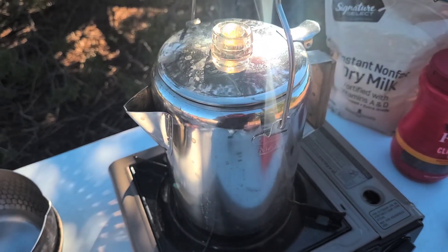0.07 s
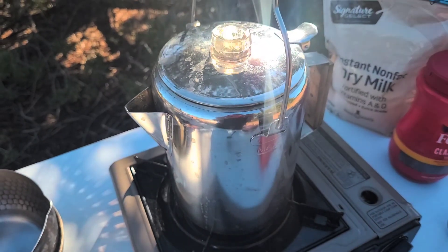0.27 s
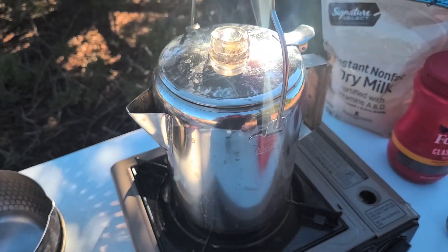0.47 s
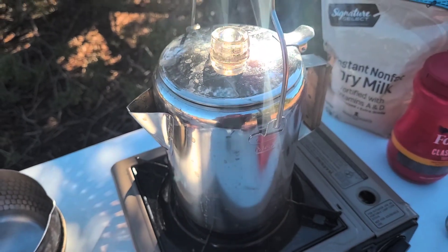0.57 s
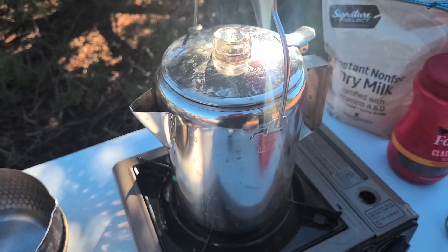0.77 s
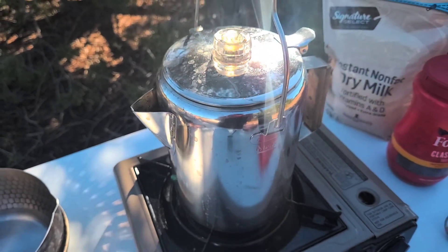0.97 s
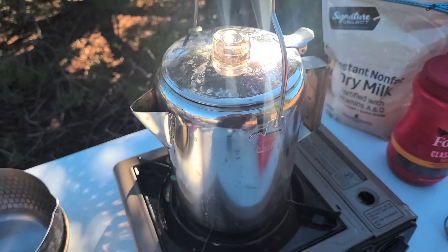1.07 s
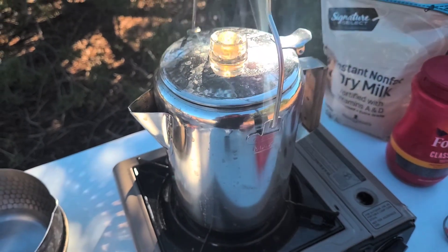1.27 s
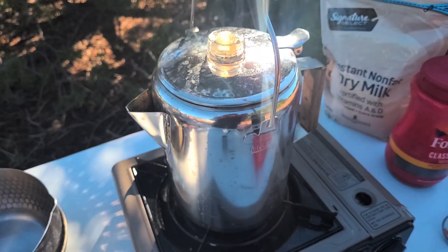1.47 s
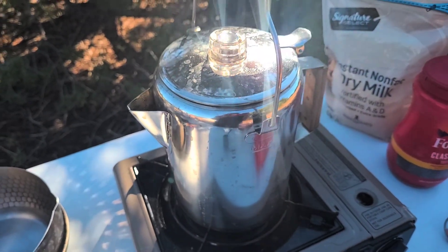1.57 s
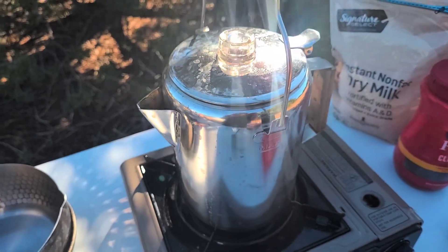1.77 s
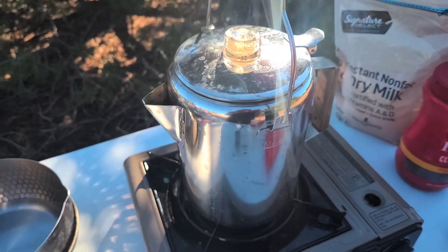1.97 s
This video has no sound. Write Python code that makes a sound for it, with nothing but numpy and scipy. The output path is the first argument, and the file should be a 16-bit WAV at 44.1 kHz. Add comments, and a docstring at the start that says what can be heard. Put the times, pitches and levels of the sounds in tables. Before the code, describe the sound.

Boiling water gurgles in surges inside a metal pot, with soft burner roar and light wind

```python
"""Dull thuds of big steam bubbles come in surges from a metal percolator on a small gas stove outdoors.
Splashes brighten each surge: pot sounds are damped sines, singly or massed over coloured noise.
The burner roars softly, with thin fizz and faint hiss, all filtered noise. A light wind buffets the two
ports of the close microphone, mostly the right one: low noise and single low damped sines."""
import sys
import numpy as np
from scipy import signal
from scipy.fft import rfft, irfft, next_fast_len
from scipy.io import wavfile
from scipy.ndimage import map_coordinates

SR = 44100
rng = np.random.default_rng(int(sys.argv[2]) if len(sys.argv) > 2 else 0)


def voltage_ratio(level):
    """Linear amplitude factor for a level in decibels (scalar or array-like)."""
    return 10 ** (np.asarray(level, float) / 20)


def pcm_store(signal):
    """Save signal as 16-bit PCM."""
    levels = np.round(np.clip(np.atleast_2d(signal), -1, 1) * 32767)
    wavfile.write(sys.argv[1], SR, levels.astype(np.int16).T)


N = 89258


def unit(x):
    """Scale to rms 1."""
    return x / np.sqrt(np.mean(x ** 2) + 1e-20)


def along(points, hz):
    """Interpolate (f/Hz, value) points on a log frequency axis."""
    f, v = np.transpose(points)
    return np.interp(np.log(hz + 1), np.log(f + 1), v)


def curves(rows):
    """One value per sample for each column after t/s."""
    t_s, *columns = np.transpose(rows)
    return [np.interp(np.arange(N) / SR, t_s, column) for column in columns]


def wobble(knots_per_s):
    """Smooth random curve through normal knots."""
    return map_coordinates(rng.standard_normal(400), [np.arange(N) * knots_per_s / SR])


def filtered(x, response):
    """Multiply the spectrum of x by a response of f/Hz."""
    m = next_fast_len(N + SR // 2)
    return irfft(rfft(x, m) * response(np.fft.rfftfreq(m, 1 / SR)), m)[..., :N]


def coloured_pair(spectrum):
    """Two unrelated noises with the given spectrum."""
    return filtered(rng.standard_normal((2, N)), lambda hz: voltage_ratio(along(spectrum, hz)))


def bubbles(start_s, gain, hz, cycles):
    """Sum of damped sines, soft start, rising pitch; the envelope peaks after half of cycles."""
    t = np.arange(SR // 5) / SR
    u = t * (hz / cycles)[:, None]
    envelope = gain[:, None] * np.e * 2 * u * np.exp(-2 * u)
    tone = envelope * np.sin(2 * np.pi * hz[:, None] * t * (1 + 0.025 * u))
    tone = tone * np.minimum(1, 3 * (1 - t / t[-1]))  # fade the last third
    at = (np.round(start_s * SR).astype(int)[:, None] + np.arange(len(t))).ravel()
    # samples before time 0 are silenced
    return np.bincount(np.clip(at, 0, None), tone.ravel() * (at >= 0), N + SR)[:N]


def froth(spectrum, low_hz, high_hz, cycles, spread_db, count):
    """Two unrelated streams of random bubbles on band noise, filtered to a colour."""
    noise_db = -4.5  # re bubbles
    streams = []
    for _ in range(2):
        d = rng.random((count, 4))
        start_s = d[:, 0] * (N / SR + 0.041) - 0.05
        hz = low_hz * (high_hz / low_hz) ** d[:, 1]
        size = hz * voltage_ratio(-spread_db * np.log(1 - d[:, 2])) * np.sign(d[:, 3] - 0.5)
        grains = bubbles(start_s, size, hz, np.full(count, cycles))
        band = filtered(rng.standard_normal(N), lambda f: (f > low_hz / 2) & (f < 2 * high_hz))
        streams.append(unit(grains) + voltage_ratio(noise_db) * unit(band))
    return unit(filtered(np.array(streams), lambda f: voltage_ratio(along(spectrum, f))))


# stereo balance: f/Hz, left minus right/dB
STOVE_LEAN = [(100, 5), (200, 4), (400, 7.5), (700, 10.5), (1300, 7.5)]
# likeness of left and right: f/Hz, share/1
STOVE_LIKENESS = [(100, .92), (200, .96), (400, .86), (700, .8), (1300, .3)]


def spread(pair):
    """Place a stream and its unrelated twin left of centre by level and lag, less alike in the treble."""
    left_lag_s = -0.00015  # left leads
    way = np.array([[1], [-1]])

    def mid_side(hz):
        turn = np.arccos(np.clip(along(STOVE_LIKENESS, hz), -1, 1)) / 2
        return np.array([np.cos(turn), np.sin(turn)])

    def ports(hz):
        return voltage_ratio(way * along(STOVE_LEAN, hz) / 2) * np.exp(-1j * way * np.pi * hz * left_lag_s)

    mid, side = filtered(pair, mid_side)
    return filtered(np.array([mid + side, mid - side]), ports)


# biggest bubbles: t/s, level/dB, f/Hz, length/cycles
BIG_BUBBLES = [(-.021, -28, 153, 11), (.038, -30, 153, 6), (.154, -35, 250, 3), (.245, -37, 140, 3),
               (.275, -35, 135, 2.5), (.43, -36, 230, 2), (.584, -34, 220, 1.5), (.605, -26, 180, 1.8),
               (.631, -32, 165, 1.3), (.646, -32, 180, 1.3), (.672, -32, 150, 1.8), (.83, -36, 160, 2),
               (.881, -33, 160, 3), (.93, -33, 170, 2), (.99, -39, 230, 3), (1.173, -38, 210, 2),
               (1.247, -33, 100, 1.6), (1.278, -37, 140, 1.6), (1.384, -41, 220, 1.5),
               (1.465, -36, 140, 1.8), (1.63, -41, 230, 3), (1.662, -38, 160, 2), (1.69, -40, 240, 4),
               (1.905, -36, 210, 2), (1.945, -37, 200, 2)]


def glugs():
    """Biggest steam bubbles: single damped sines, the first begun before time 0."""
    t_s, level_db, hz, cycles = np.transpose(BIG_BUBBLES)
    return bubbles(t_s, voltage_ratio(level_db), hz, cycles)


# boiling surges: t/s, thud level/dB, splash level/dB
SURGES = [(.0, -39, -52), (.063, -38, -46), (.089, -41, -55), (.117, -41, -53), (.189, -46, -61),
          (.271, -41, -54), (.359, -46, -68), (.431, -41, -50), (.469, -43, -57), (.563, -47, -63),
          (.613, -39, -54), (.667, -42, -55), (.76, -51, -69), (.82, -50, -66), (.85, -44, -61),
          (.953, -41, -54), (1.013, -48, -69), (1.135, -50, -69), (1.18, -46, -57), (1.277, -45, -57),
          (1.327, -51, -64), (1.393, -47, -69), (1.415, -53, -70), (1.459, -44, -55), (1.5, -46, -58),
          (1.569, -52, -68), (1.641, -46, -58), (1.7, -46, -63), (1.789, -50, -73), (1.82, -48, -62),
          (1.927, -42, -58), (2.0, -47, -64)]
# thud filter: f/Hz, gain/dB
THUD_COLOUR = [(47, -40), (80, 4), (108, -3), (151, -1.5), (193, -4), (225, 0), (309, -6), (376, -21),
               (450, -13.5), (580, -47), (990, -120)]


def thuds():
    """Massed low bubbles, level following the surges."""
    thud_db, _ = curves(SURGES)
    return voltage_ratio(thud_db) * froth(THUD_COLOUR, low_hz=73.6, high_hz=420, cycles=3.12, spread_db=1.5, count=600)


# splash filter: f/Hz, gain/dB
SPLASH_COLOUR = [(190, -18.5), (330, 0), (377, -13.5), (430, -9), (563, -13.5), (901, -33.5), (1300, -48.5),
                 (1690, -64.5), (2860, -120)]


def splashes():
    """Massed higher, smaller bubbles, level following the surges."""
    _, splash_db = curves(SURGES)
    grains = froth(SPLASH_COLOUR, low_hz=330.2, high_hz=1110, cycles=3.5, spread_db=1.5, count=1000)
    return voltage_ratio(splash_db) * grains


# burner spectrum: f/Hz, density/dB
FLAME_COLOUR = [(150, -30.5), (250, 3.5), (340, -3), (575, -31), (714, -23.5), (809, -37.5), (1200, -41.5),
                (1560, -75), (2640, -120)]


def flame():
    """Soft steady burner roar: filtered noise."""
    return voltage_ratio(-55.5) * spread(unit(coloured_pair(FLAME_COLOUR)))


# spray spectrum: f/Hz, density/dB
FIZZ_COLOUR = [(900, -27.5), (1200, -5.5), (2500, -7.5), (4000, -16), (6000, -14)]


def fizz():
    """Thin spray noise, 900 to 6000 Hz, swelling with the splashing."""
    level_db, growth_db_per_db = -89, 0.29
    _, splash_db = curves(SURGES)
    noise = filtered(rng.standard_normal((2, N)),
                     lambda f: voltage_ratio(along(FIZZ_COLOUR, f)) * (f > 900) * (f < 6000))
    return voltage_ratio(level_db + growth_db_per_db * (splash_db - splash_db.mean())) * unit(noise)


# wind on the ports: t/s, level/dB, left minus right/dB
GUSTS = [(0, -48, -4), (.15, -49, -8), (.3, -46, -5), (.45, -46, -7), (.55, -49, -1), (.66, -46, 2),
         (.76, -57, -3), (.95, -46, 2), (1.02, -54, -1), (1.2, -53, 1), (1.27, -44, 1), (1.33, -53, -3),
         (1.45, -51, -3), (1.62, -52, -11), (1.8, -48, -11), (2.02, -47, -11)]
# buffet spectrum: f/Hz, density/dB
BUFFET_COLOUR = [(12, -37), (20, -43.5), (43, 5), (59, 8), (75, -11), (102, -10.5), (130, -11.5),
                 (170, -37.5), (290, -120)]


def wind():
    """Low buffeting noise, partly shared by the ports, with moving level and balance."""
    level_db, lean_db = curves(GUSTS)
    a, b = coloured_pair(BUFFET_COLOUR)
    pair = np.array([unit(a + 1.2 * b), unit(b)])
    share = np.array([voltage_ratio(lean_db), np.ones(N)]) / np.sqrt(1 + voltage_ratio(2 * lean_db))
    return voltage_ratio(level_db) * share * pair


# hiss spectrum: f/Hz, density/dB
HISS_COLOUR = [(530, -22), (900, -7), (1240, -4.5), (2310, -9.5), (2570, -9.5), (5980, -15.5), (6420, -14),
               (7590, -16), (10200, -12.5), (14100, -3.5), (15500, -6.5)]
# hiss balance: f/Hz, left minus right/dB
HISS_BALANCE = [(1500, 0.5), (4000, 1), (8000, -4.5), (14000, 6)]


def hiss():
    """Faint unrelated noise per channel, wavering and swelling a little with the boiling."""
    level_db, growth_db_per_db, waver_db = -74, 0.04, 0.37
    thud_db, _ = curves(SURGES)
    way = np.array([[1], [-1]])
    noise = filtered(rng.standard_normal((2, N)),
                     lambda f: voltage_ratio(along(HISS_COLOUR, f) + way * along(HISS_BALANCE, f) / 2))
    swell_db = growth_db_per_db * (thud_db - thud_db.mean())
    return voltage_ratio(level_db + swell_db + waver_db * wobble(knots_per_s=2)) * unit(noise)


# wind thumps: t/s, right level/dB, f/Hz, length/cycles
WIND_THUMPS = [(.043, -24, 52, 1.5), (.405, -28, 55, 2.5), (1.665, -32, 55, 2), (1.8, -32, 65, 3),
               (1.86, -35, 62, 2), (1.915, -34, 58, 2), (1.98, -27, 48, 1.5)]


def thumps():
    """Single low damped sines of wind on the right port, 25.5 dB weaker on the left."""
    t_s, level_db, hz, cycles = np.transpose(WIND_THUMPS)
    return bubbles(t_s, voltage_ratio(level_db), hz, cycles) * voltage_ratio([[-25.5], [0]])


# bright plops that open a splash: t/s, level before trim/dB, f/Hz, length before lower limit/cycles
BRIGHT_PLOPS = [(0.045, -35, 406, 0.85), (0.223, -39.5, 414, 0.75), (0.424, -44, 532, 1.9),
                (0.444, -37.5, 434, 1.9), (0.585, -45, 455, 2.8), (0.607, -45.5, 485, 1.7),
                (0.649, -54, 556, 2.2), (0.84, -48.5, 482, 2), (0.949, -41, 440, 1.3),
                (1.174, -43.5, 420, 2.8), (1.199, -66, 398, 1.4), (1.45, -43, 440, 1.56),
                (1.628, -50.5, 516, 3.3)]


def plops():
    """Bright single bubbles: damped sines of at least one cycle."""
    trim_db = -1
    t_s, level_db, hz, cycles = np.transpose(BRIGHT_PLOPS)
    return bubbles(t_s, voltage_ratio(level_db + trim_db), hz, np.maximum(cycles, 1))


def scene():
    """Pot, flame, fizz, wind and hiss."""
    single = (glugs() + plops()) * [[1], [0]]  # no unrelated twin
    pot = spread(single + thuds() + splashes())
    return pot + flame() + fizz() + wind() + hiss() + thumps()


def band_limit(x):
    """A steep low-pass at the top of the band."""
    return signal.sosfilt(signal.butter(12, 16470, fs=SR, output="sos"), x)


def record(dry):
    """Band limit at 15520 Hz."""
    mix = filtered(dry, lambda hz: hz < 15520)
    return band_limit(mix)


dry = scene()
out = record(dry)
pcm_store(out)
```